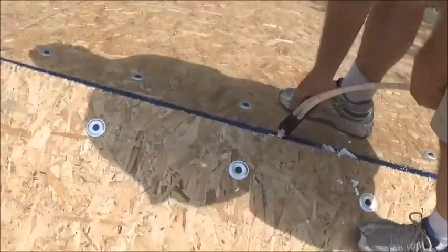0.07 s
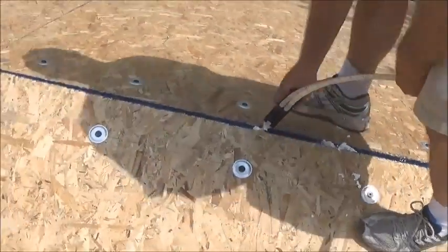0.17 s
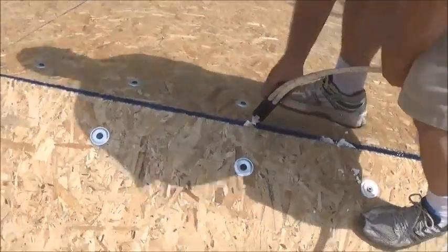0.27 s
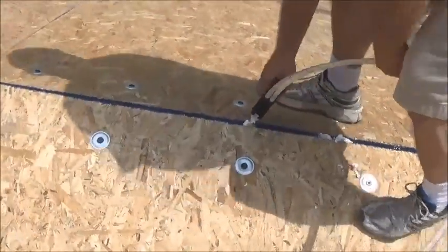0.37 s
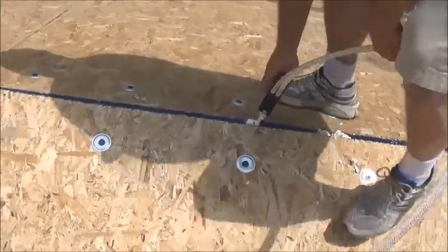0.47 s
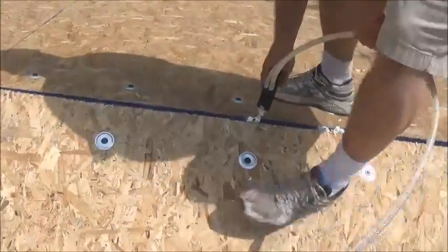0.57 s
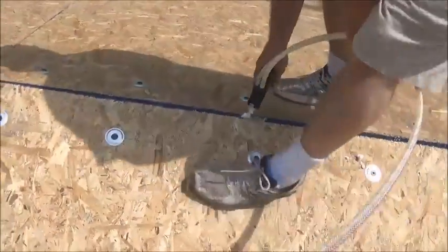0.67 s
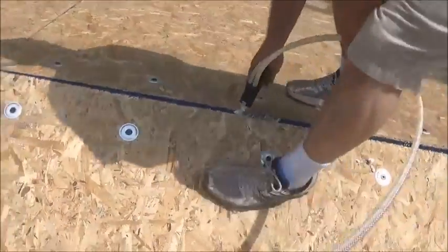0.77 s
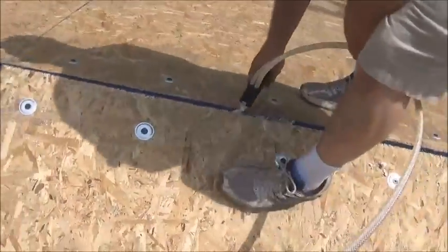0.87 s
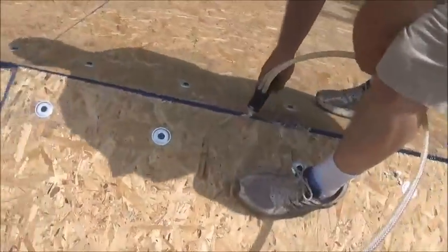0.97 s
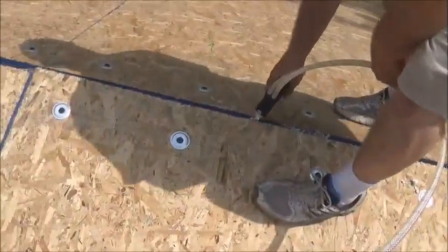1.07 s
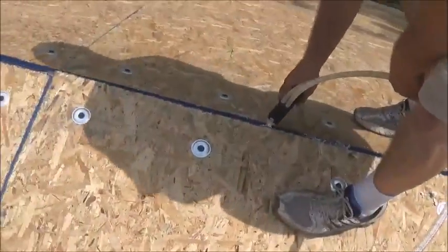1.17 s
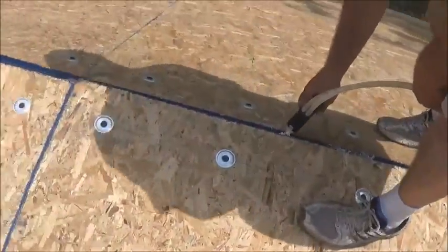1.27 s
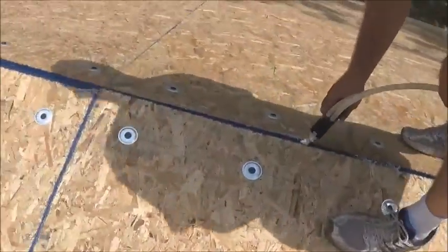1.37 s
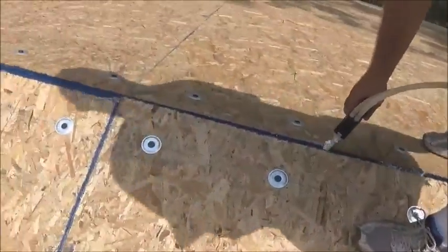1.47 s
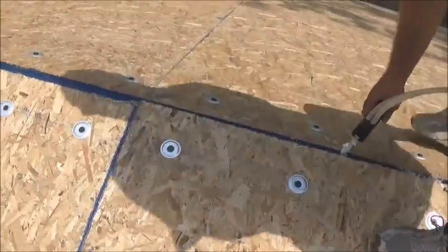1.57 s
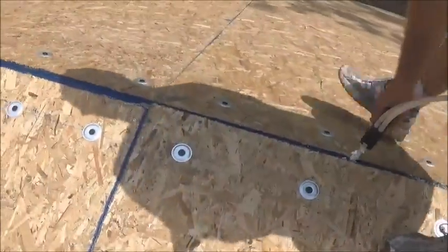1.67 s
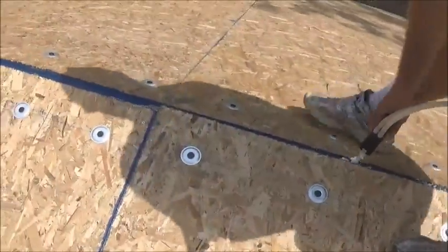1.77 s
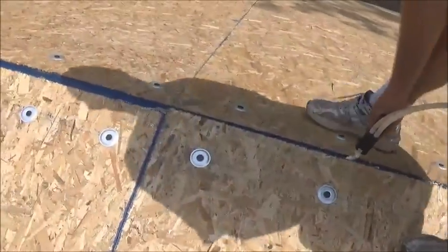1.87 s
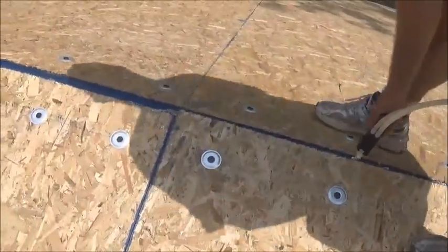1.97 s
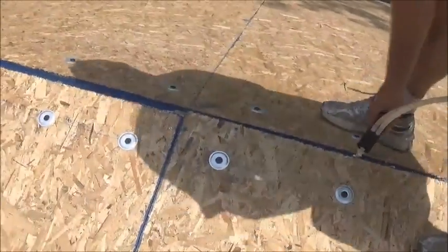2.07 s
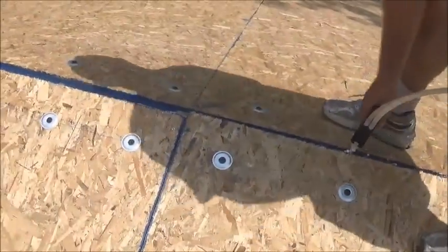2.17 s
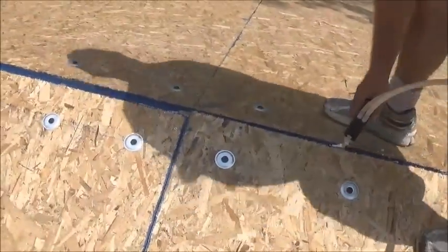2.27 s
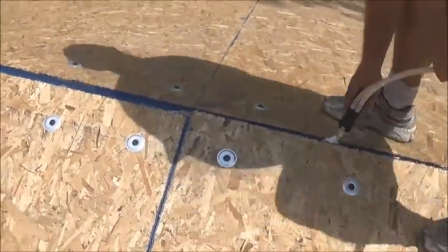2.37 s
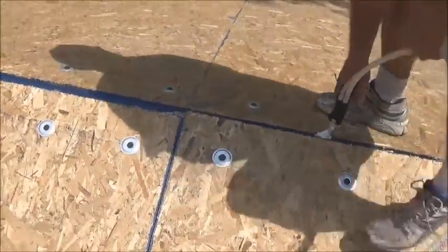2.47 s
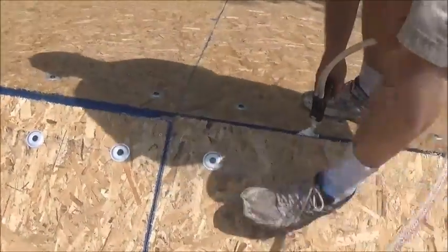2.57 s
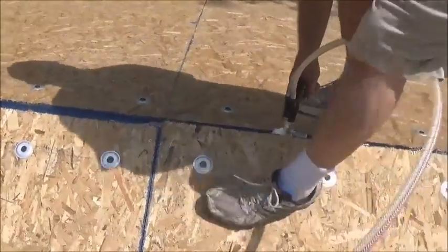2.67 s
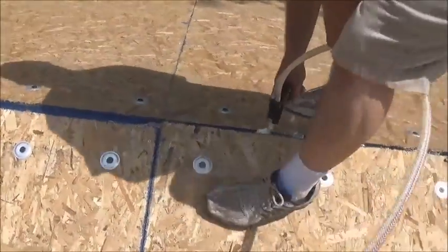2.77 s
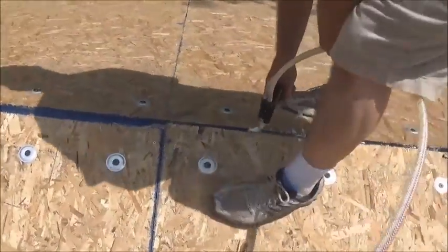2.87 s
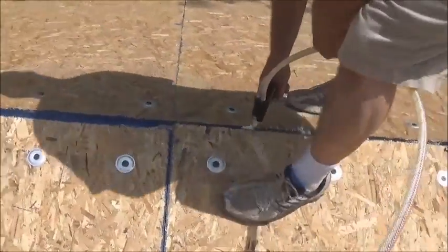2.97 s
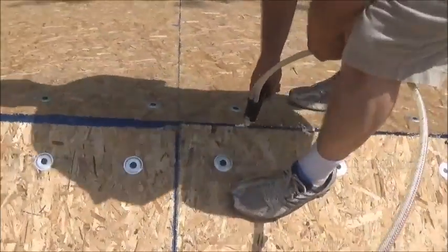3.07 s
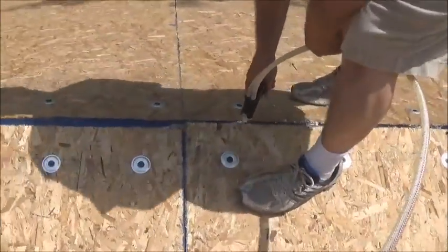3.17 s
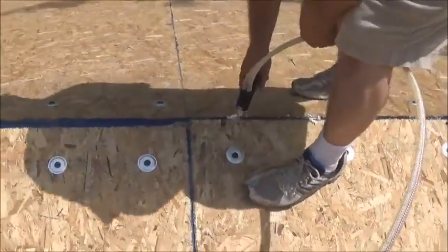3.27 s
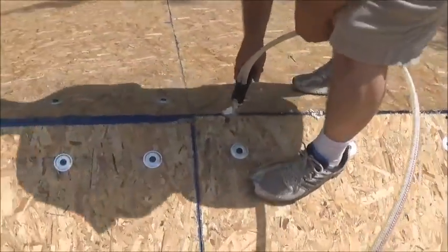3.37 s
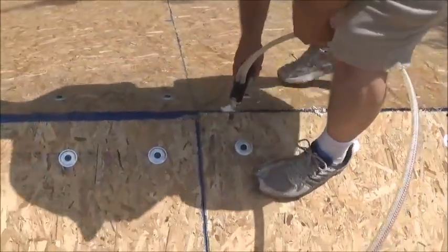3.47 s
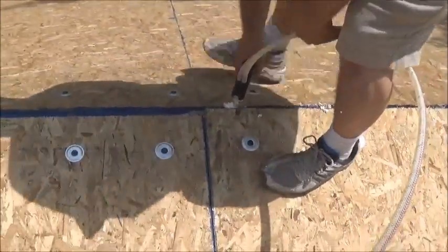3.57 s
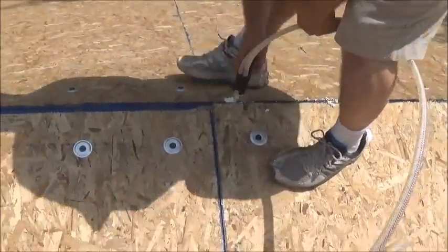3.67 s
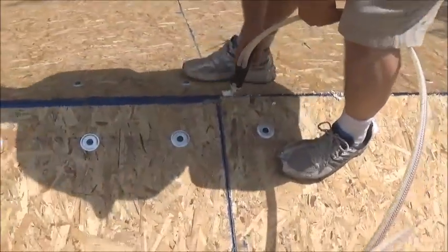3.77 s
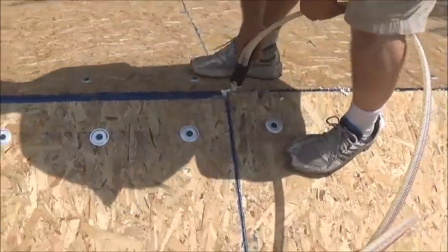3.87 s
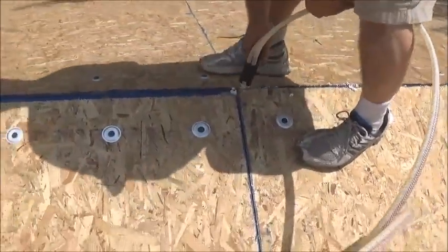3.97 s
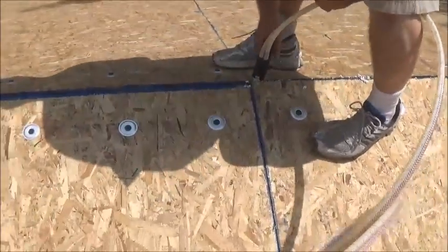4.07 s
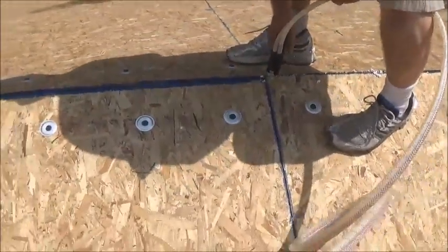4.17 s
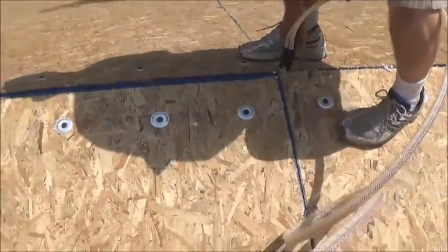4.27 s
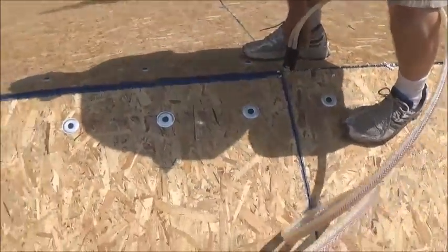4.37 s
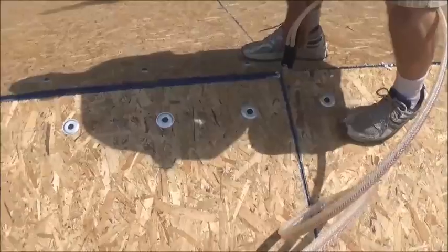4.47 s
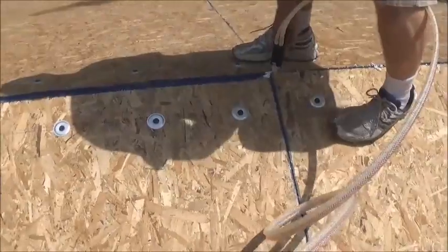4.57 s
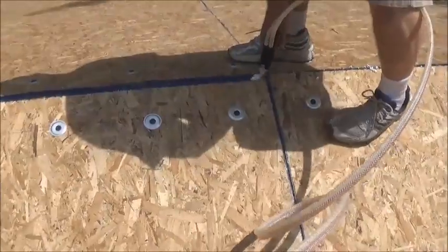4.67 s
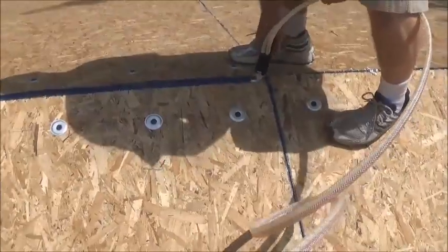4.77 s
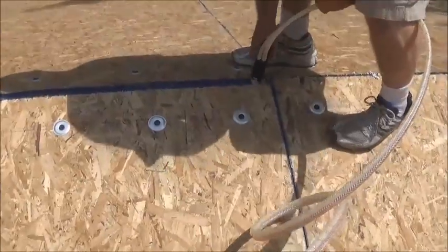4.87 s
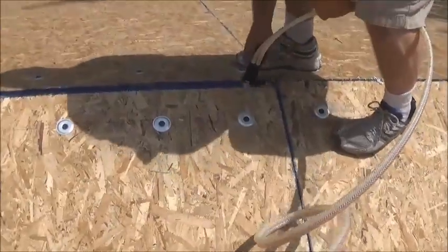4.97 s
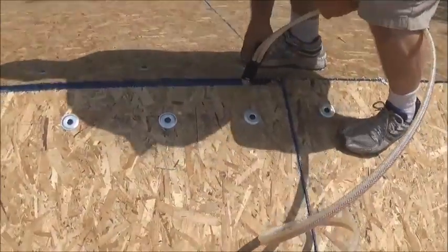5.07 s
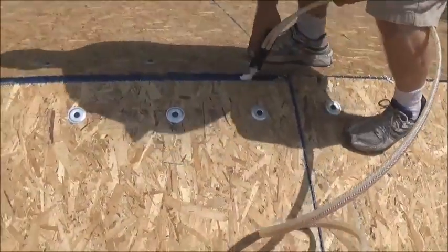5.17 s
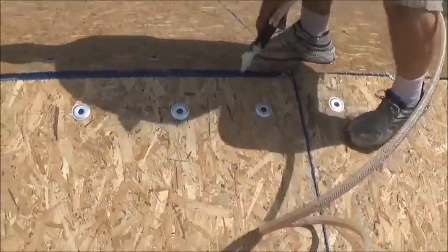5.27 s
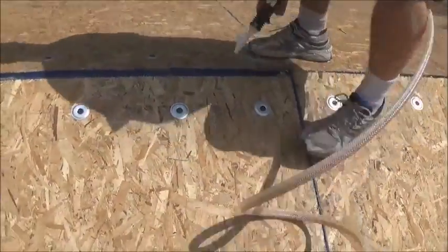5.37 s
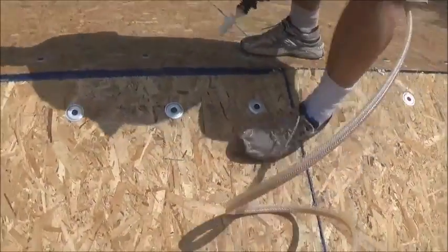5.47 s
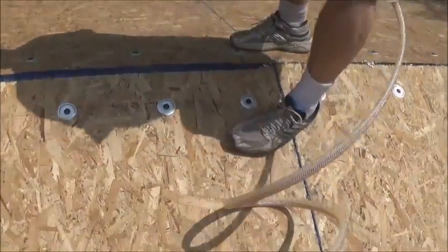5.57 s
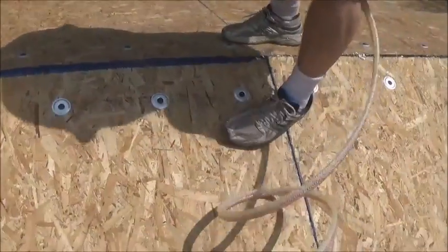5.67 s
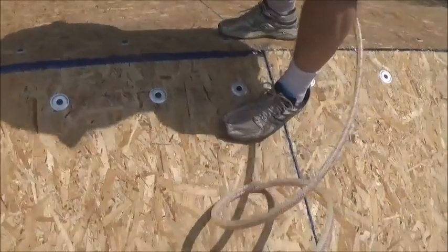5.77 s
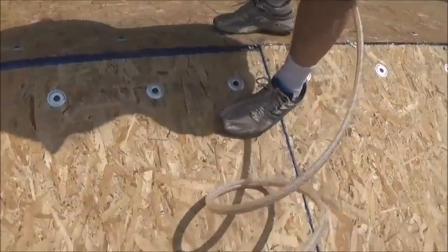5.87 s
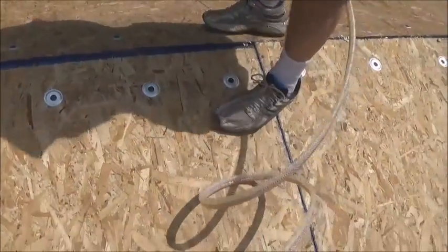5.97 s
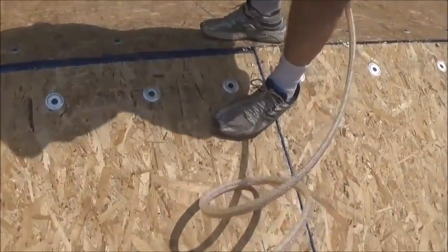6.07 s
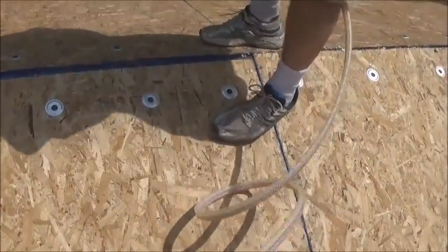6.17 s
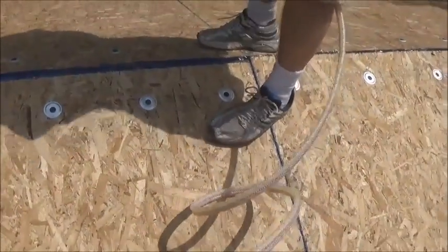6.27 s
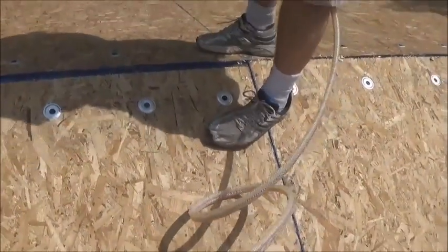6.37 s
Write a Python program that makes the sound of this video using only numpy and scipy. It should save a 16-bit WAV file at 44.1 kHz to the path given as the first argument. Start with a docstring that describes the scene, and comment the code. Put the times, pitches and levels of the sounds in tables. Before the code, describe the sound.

Close, wet, fizzing foam spray runs for five seconds with footsteps on boards, then a spit, a clack and dull hose thumps in light wind.

```python
"""Foam is sprayed along a seam in a wooden roof deck, in light wind: filtered noise hisses, fizzes and gurgles.
From the start tiny pings pop, small pockets ring, and moving echoes off the arm and a leg colour the hiss.
Then shoes knock and scuff on the boards, as fading tones and bursts of noise; later a corner sings.
The trigger is let go and the flow sags; the gun spits puffs of noise and clacks with ringing tones.
Last, the hose drops with dull thuds, the deck booms as a low narrow noise, and the wind is left."""
import sys
import numpy as np
from scipy import signal
from scipy.fft import rfft, irfft, next_fast_len
from scipy.io import wavfile
from scipy.ndimage import uniform_filter1d, map_coordinates

SR = 44100
rng = np.random.default_rng(int(sys.argv[2]) if len(sys.argv) > 2 else 0)


def transcribe(signal):
    """Save signal, clipped to [-1, 1], as a 16-bit WAV file at the path in sys.argv[1]."""
    frames = np.atleast_2d(signal).T
    limited = np.clip(frames, -1, 1)
    pcm = np.round(limited * 32767).astype(np.int16)
    wavfile.write(sys.argv[1], SR, pcm)


N = 283563  # length of the scene in samples
TOP_HZ = 11120


def amp(db):
    """Turn decibels into a gain."""
    return 10 ** (np.asarray(db) / 20)


def unit(x):
    """Scale a sound to an rms (average strength) of 1."""
    return x / np.sqrt(np.mean(x ** 2) + 1e-20)


def curves(rows):
    """Join the rows by straight lines: one curve for each column after the time."""
    s, *columns = np.transpose(rows)
    t = np.arange(N) / SR
    return [np.interp(t, s, column) for column in columns]


def wobble(rate):
    """A smooth random curve through a number of random points each second (rate)."""
    points = rng.standard_normal(int(N * rate / SR) + 4)
    return map_coordinates(points, [np.arange(N) * rate / SR])


def gate(start, end, fade_s):
    """1 between start and end (s), with straight fades inside."""
    t = np.arange(N) / SR
    return np.clip(np.minimum(t - start, end - t) / fade_s, 0, 1)


def add(track, s, sound):
    """Mix a sound into the track at time s."""
    part = track[max(round(s * SR), 0):][:len(sound)]
    part += sound[:len(part)]


def filtered(x, response):
    """Make each frequency louder or softer by the given response."""
    m = next_fast_len(x.shape[-1] + 8192)
    spectrum = rfft(x, m) * response(np.fft.rfftfreq(m, 1 / SR))
    return irfft(spectrum, m)[..., :x.shape[-1]]


def colour(points, hz):
    f, db = np.transpose(points)
    return amp(np.interp(np.log(hz + 1), np.log(f + 1), db)) * (hz < TOP_HZ)


def noise(spectrum):
    """Steady coloured noise of rms 1."""
    return unit(filtered(rng.standard_normal(N), lambda hz: colour(spectrum, hz)))


def narrow(pitch_hz, width_hz):
    """Noise of rms 1 in a narrow resonance that follows a pitch curve."""
    white = rng.standard_normal((2, len(pitch_hz)))
    flutter = filtered(white, lambda f: 1 / (1 + (f / width_hz) ** 2))
    phase = 2 * np.pi * np.cumsum(pitch_hz) / SR
    return unit(flutter[0] * np.cos(phase) + flutter[1] * np.sin(phase))


def ears(mid, side, left_db=0):
    """Left and right from a common part and a diffuse part that has opposite signs in the two ears."""
    return np.array([(mid + side) * amp(left_db / 2), (mid - side) * amp(-left_db / 2)])


def spread(x, side_db):
    """Nearly mono: a faint diffuse part, like x but with random phase, differs between the ears."""
    z = signal.stft(x, nperseg=256)[2]
    scrambled = z * np.exp(2j * np.pi * rng.random(z.shape))
    diffuse = signal.istft(scrambled, nperseg=256)[1][:N]
    return ears(x, amp(side_db) * np.std(x) * unit(diffuse))


# how hard the wind rumbles: (time [s], level [dB])
WIND_RUMBLE = [(0, -56), (1.15, -65), (1.75, -61), (1.86, -38.5), (2.35, -53), (3.4, -53), (3.78, -42.5),
               (4.2, -46), (4.8, -52), (5.3, -41), (5.6, -37.5), (5.95, -41), (6.15, -39)]
# tone of the wind rumble: (frequency [Hz], relative level [dB])
RUMBLE_COLOUR = [(22, -6), (60, 4), (260, -1), (400, -15), (700, -19), (2000, -63)]
# tone of the open-air hiss: (frequency [Hz], relative level [dB])
AIR_COLOUR = [(150, -30), (300, -5.5), (640, -2.5), (1100, -9.5), (6600, -21.5), (8600, -19), (11000, -25)]


def outdoors(air_db=-43.5, air_grows=0.14, air_side_db=-7, rumble_side_db=-12,
             hum_db=-53, hum_hz=88, hum_width_hz=10):
    """Wind rumbles on the microphone; a soft open-air hiss is louder where the rumble is, over a low hum."""
    rumble_db, = curves(WIND_RUMBLE)
    rumble_stereo = ears(noise(RUMBLE_COLOUR), amp(rumble_side_db) * noise(RUMBLE_COLOUR))
    rumble = amp(rumble_db + 1.7 * wobble(13)) * rumble_stereo
    # air_db is reached at the peak of the rumble curve
    air_level_db = air_db + air_grows * (rumble_db - rumble_db.max())
    air = amp(air_level_db) * ears(noise(AIR_COLOUR), amp(air_side_db) * noise(AIR_COLOUR))
    hum = amp(hum_db) * narrow(np.full(N, hum_hz), hum_width_hz)
    return rumble + air + hum


def froth(spectrum, patchy_db):
    """Noise of rms 1 in which short-lived cavities lift and drop narrow bands."""
    z = signal.stft(rng.standard_normal(N), nperseg=512)[2]
    field = rng.standard_normal(z.shape)
    # smooth the random field over pitch, then time, so that each patch lasts a moment
    for _ in range(2):
        field = uniform_filter1d(field, size=3, axis=0)
        field = uniform_filter1d(field, size=8, axis=1)
    patchy = signal.istft(z * amp(patchy_db * unit(field)), nperseg=512)[1][:N]
    return unit(filtered(patchy, lambda hz: colour(spectrum, hz)))


# bursting bubbles: middle pitch [Hz], starting level over the splutter curve before random size [dB]
POP_HZ, POP_DB = 2580, 5


def pops(rate=45, scatter_db=5.0, t60=0.0028):
    """Foam bubbles burst at random, each a tiny ping of its own pitch and size."""
    out, t = np.zeros(N), np.arange(SR // 100) / SR
    count = int(rate * N / SR)
    times = rng.uniform(0, N / SR, count)
    pitches, sizes = rng.standard_normal((2, count))
    for s, pitch, size in zip(times, pitches, sizes):
        hz = POP_HZ * 2 ** (pitch / 2)
        add(out, s, amp(scatter_db * size - 60 * t / t60) * np.sin(2 * np.pi * hz * t))
    return out


# the trigger is let go [s], the flow sags [dB per s], the valve is shut [s] after closing for a while [s]
RELEASE_S, SAG_DB_PER_S, SHUT_S, SHUTTING_S = 5.147, 125, 5.29, 0.06


def trigger():
    """Full flow until the release, then a steady sag until the valve shuts."""
    t = np.arange(N) / SR
    sag = amp(-SAG_DB_PER_S * np.maximum(t - RELEASE_S, 0))
    valve = np.clip((SHUT_S - t) / SHUTTING_S, 0, 1)
    return sag * valve


# how freely the tip blows; burying it trades the gas jet for splutter in the seam, before trim:
# (time [s], jet level [dB], splutter level [dB])
TIP_FLOW = [(0.08, -30.5, -31), (0.11, -23, -29.5), (1.08, -21, -30.5), (1.49, -21.5, -25),
            (1.515, -21, -35), (1.755, -22, -31), (1.79, -25.5, -27.5), (1.85, -30, -32.5),
            (2.22, -30.5, -29.5), (2.27, -21.5, -35), (2.4, -23, -28.5), (2.62, -17, -32), (2.68, -25, -30),
            (2.86, -30, -28), (2.89, -24.5, -26), (3.24, -27, -26.5), (3.38, -18.5, -29.5),
            (3.55, -22, -26.5), (3.735, -23.5, -24), (3.765, -18.5, -31), (4.42, -24.5, -25.5),
            (4.71, -18, -32.5), (4.82, -21, -27), (4.95, -20, -34), (5.14, -20, -28)]
# foam flow heard as fizz, before trim: (time [s], level [dB])
FOAM_FLOW = [(0.07, -33), (0.1, -26), (0.4, -27), (0.8, -30.5), (0.88, -27), (1.3, -23.5), (1.58, -29.5),
             (1.81, -30), (1.84, -34), (2.22, -31.5), (2.3, -26.5), (2.55, -28.5), (2.85, -30),
             (2.97, -22.5), (3.13, -29.5), (3.17, -26), (3.22, -31), (3.27, -26), (3.73, -24.5),
             (3.76, -31), (4.71, -31), (4.8, -23), (4.98, -27), (5.03, -23)]
# tones of the jet, fizz, splutter and gurgle: (frequency [Hz], relative level [dB])
JET_COLOUR = [(3000, -38), (6500, -12), (9000, -4), (10500, -0.5), (11100, -9.5)]
FIZZ_COLOUR = [(1200, -47), (2800, -19), (3400, -4.5), (4200, 0.5), (5700, -0.5), (8700, -12.5),
               (11000, -33)]
SPLUTTER_COLOUR = [(700, -20), (1400, -7.5), (1750, 0.5), (2600, 1), (3300, -2), (4200, -16.5),
                   (11000, -23.5)]
GURGLE_COLOUR = [(50, -19), (220, -4), (400, -11.5), (760, -3), (1250, 1), (1700, -9), (4000, -44)]
# trim of each layer [dB]
JET_DB, FIZZ_DB, SPLUTTER_DB = 0.5, 0.5, -0.83
# gurgle deep in the seam: mean of its level curve [dB], dB gained per dB of splutter, dB lost per dB of jet
GURGLE_DB, GURGLE_GROWS, GURGLE_YIELDS = -33.5, 1, 0.36


def spray():
    """Gas and foam leave the nozzle unevenly; bursting cells roughen the hiss."""
    jet_db, splutter_db = curves(TIP_FLOW)
    fizz_db, = curves(FOAM_FLOW)
    gurgle_gain_db = GURGLE_GROWS * (splutter_db - splutter_db.mean())
    gurgle_loss_db = GURGLE_YIELDS * (jet_db - jet_db.mean())
    gurgle_db = GURGLE_DB + gurgle_gain_db - gurgle_loss_db
    # the flow is least steady when the tip is buried and splutters
    buried = 1 / (1 + amp(jet_db - splutter_db))
    surge_db = (0.61 + 1.2 * buried) * (0.64 * wobble(45) + 0.55 * wobble(260))
    jet = amp(JET_DB + jet_db + 2.8 * buried * wobble(55)) * froth(JET_COLOUR, patchy_db=2.5)
    fizz = amp(FIZZ_DB + fizz_db + 0.72 * wobble(29.8)) * froth(FIZZ_COLOUR, patchy_db=2.1)
    splutter_level = amp(SPLUTTER_DB + splutter_db + 1.14 * wobble(30))
    splutter = splutter_level * froth(SPLUTTER_COLOUR, patchy_db=2.0)
    gurgle = amp(gurgle_db + 1.6 * wobble(25.0)) * froth(GURGLE_COLOUR, patchy_db=2.5)
    bubbles = amp(POP_DB + splutter_db) * pops()
    return trigger() * amp(surge_db) * (jet + fizz + splutter + gurgle + bubbles)


# echo from the arm that holds the gun: (time [s], delay [ms])
ARM_DELAY = [(.2, 1.23), (.9, 1.17), (1.2, 1.24), (1.65, 1.23), (2.1, 1.22), (2.9, 1.13), (3.3, 1.193),
             (3.6, 1.15), (4.1, 1.31), (4.65, 1.46), (5.15, 1.25)]
# this echo fades as the arm turns away: (time [s], strength [ratio to the direct sound])
ARM_ECHO = [(1, 0.25), (4, 0.19)]
# a shoe or shin is set beside the seam and the nozzle draws away from it:
# (time [s], length [s], first delay [ms], last delay [ms])
LEG_STANCES = [(1.797, 0.98, 0.58, 1), (2.695, 1, 1.33, 1.77), (3.697, .93, 0.736, 0.74)]
# strength of the leg echo at 1 ms delay [ratio] (it falls with distance), and its fade in and out [s]
LEG_STRENGTH, LEG_FADE_S = 0.15, 0.053


def reflectors():
    """Delay (ms) and strength of the echo from the arm and from each stance of the leg."""
    paths = [curves(ARM_DELAY) + curves(ARM_ECHO)]
    for s, length, first_ms, last_ms in LEG_STANCES:
        delay_ms, = curves([(s, first_ms), (s + length, last_ms)])
        strength = LEG_STRENGTH / delay_ms * gate(s, s + length, LEG_FADE_S)
        paths.append((delay_ms, strength))
    return paths


def reflected(x, paths):
    """x plus moving echoes; they sweep a comb of notches through it, scaled to even out the power."""
    total, power = x.copy(), 1
    for delay_ms, strength in paths:
        lag = delay_ms * SR / 1000  # in samples
        total += strength * map_coordinates(x, [np.arange(N) - lag])
        power = power + strength ** 2
    return total / np.sqrt(power)


# pockets in the seam that ring briefly as the jet passes: (time [s], length [s], pitch [Hz], level [dB])
SEAM_POCKETS = [(0, 0.24, 880, -40.5), (1.081, .16, 6050, -28.5), (1.2, 0.12, 5100, -31),
                (.7, 1.05, 940, -39.5), (1.441, 0.39, 2355, -34.5), (1.762, .09, 3130, -32.5),
                (1.918, 0.31, 1596, -33.5), (1.967, 0.18, 5700, -37), (2.008, 0.17, 4290, -34.5),
                (2.167, 0.3, 2667, -32), (2.179, .2, 890, -35), (2.274, 0.12, 5080, -28),
                (2.4, 0.1, 3420, -29), (3.079, .26, 799, -33), (3.498, 0.27, 1757, -28.5),
                (3.854, 0.92, 5320, -35.5), (4.979, 0.2, 2950, -36)]


def pockets(width_hz=170, wander=.02, sputter_db=1.4):
    """Each small pocket swells and fades as the jet crosses it; foam bends its pitch and makes it sputter."""
    out = np.zeros(N)
    for s, length, hz, db in SEAM_POCKETS:
        swell = signal.windows.tukey(int(length * SR))
        pitch_hz = hz * (1 + wander * wobble(20)[:len(swell)])
        level = amp(db + sputter_db * wobble(45.7)[:len(swell)])
        add(out, s, level * swell * narrow(pitch_hz, width_hz))
    return out


# tone of the wood chips that crackle under any blow: (frequency [Hz], relative level [dB])
CHIP_COLOUR = [(300, 1), (1500, 3), (2600, -6.5), (4000, -13), (11000, -27)]


def crackle(t60=0.019):
    """A burst of crushed wood chips: coloured noise of rms 1 under a quick fade."""
    t = np.arange(SR // 4) / SR
    chips = filtered(rng.standard_normal(len(t)), lambda hz: colour(CHIP_COLOUR, hz))
    return unit(chips) * amp(-60 * t / t60)


# shoes landing on the deck, before the modes add their own levels:
# (time [s], ring of the board [dB], low thud [dB], bright slap [dB])
FOOTFALLS = [(.665, -17, -36, -25), (0.724, -52, -37, -16), (1.324, -27, -23, -47), (2.413, -25, -42, -46),
             (2.572, -24.5, -35, -39), (2.696, -33, -32, -31), (3.745, -31, -26, -21),
             (4.818, -24, -49, -38), (5.4496, -19.5, -34, -13.5)]
# ringing tones of the deck: (middle pitch [Hz], relative level [dB], time to fall 60 dB [s])
DECK_MODES = [(256, -12, 0.1), (363, -10, 0.15), (499, 1.5, 0.075), (700, -6, 0.04), (1590, -9, 0.042)]
# short tones of the board right under the sole, which merge into one crack:
# (middle pitch [Hz], relative level [dB], time to fall 60 dB [s])
SLAP_MODES = [(720, 0, 0.0091), (1140, -6.5, 0.011)]
# low tones of the joists under the deck: (middle pitch [Hz], time to fall 60 dB [s])
JOIST_MODES = [(105, 0.035), (175, 0.062), (270, 0.059)]


def steps(onset_s=0.00066, crackle_db=-8):
    """Each footfall slaps the board, rings its modes and thuds into the joists; a soft one builds up slowly."""
    out, t = np.zeros(N), np.arange(SR // 4) / SR

    def mode(hz, t60):
        """One fading tone, slightly off its middle pitch."""
        return amp(-60 * t / t60) * np.sin(2 * np.pi * hz * rng.normal(1, 0.024) * t)

    for s, ring_db, thud_db, slap_db in FOOTFALLS:
        ring = sum(amp(ring_db + level + rng.normal(0, 0.84)) * mode(hz, t60)
                   for hz, level, t60 in DECK_MODES)
        thud = amp(thud_db) * sum(mode(hz, t60) for hz, t60 in JOIST_MODES)
        # neighbouring slap modes start in opposite directions
        slap = sum((-1) ** k * amp(slap_db + level) * mode(hz, t60)
                   for k, (hz, level, t60) in enumerate(SLAP_MODES))
        rise_s = onset_s * amp((ring_db - slap_db) / 2)
        rise = 1 - np.exp(-t / rise_s)
        add(out, s, amp(slap_db + crackle_db) * crackle() - rise * (ring + thud) - slap)
    return out


# short bursts of low noise: soles or hose sliding, the clack's after-tap, the low part of a spit:
# (time [s], length [s], level [dB])
LOW_BURSTS = [(0.665, 0.098, -28.5), (1.81, 0.2, -34.5), (2.667, 0.058, -27), (3.727, 0.12, -37.5),
              (3.936, 0.73, -37.5), (5.55, 0.019, -37), (5.923, 0.034, -39)]
# tone of these bursts: (frequency [Hz], relative level [dB])
SCUFF_COLOUR = [(60, -23), (200, 1.5), (1400, -4.5), (3000, -29), (11000, -22)]


def scuffs():
    """Short bursts of low, fluttering noise: slides that catch and slip, an after-tap and the low part of a spit."""
    level = np.zeros(N)
    for s, length, db in LOW_BURSTS:
        add(level, s, amp(db) * signal.windows.tukey(int(length * SR)))
    fluttering = unit(noise(SCUFF_COLOUR) * amp(3.5 * wobble(220)))
    return level * fluttering


# hollow note of the foam-filled corner: (time [s], pitch [Hz], level [dB])
CORNER_NOTE = [(4.5, 564, -31.5), (4.76, 593, -43.5), (4.81, 662, -26), (4.97, 660, -38), (5.17, 641, -34)]


def hollow(width_hz=52, fade_s=0.076):
    """The jet blows across the corner of the seam, whose note mostly rises as foam fills it."""
    pitch_hz, level_db = curves(CORNER_NOTE)
    note = amp(level_db) * narrow(pitch_hz, width_hz)
    return note * gate(CORNER_NOTE[0][0], SHUT_S, fade_s) * trigger()


# spits of the closed gun, before a soft attack: (time [s], level [dB], time to fall 60 dB [s])
GUN_SPITS = [(5.326, -24.5, 0.054), (5.929, -37.5, 0.095)]
# tone of the spits: (frequency [Hz], relative level [dB])
SPIT_COLOUR = [(400, -21), (1900, -2), (2900, 8.5), (3600, -4), (4600, 3.5), (7200, -4.5), (10000, 3)]
# gas seeping from the nozzle as it closes and after: start [s], end [s], middle level [dB]
SEEP_FROM_S, SEEP_TO_S, SEEP_DB = 5.2, 5.99, -52.5


def spits(attack=0.00081):
    """Trapped gas seeps out and escapes in short puffs."""
    puffs, t = np.zeros(N), np.arange(SR // 5) / SR
    for s, db, t60 in GUN_SPITS:
        add(puffs, s, amp(db - 60 * t / t60) * (1 - np.exp(-t / attack)))
    seep = amp(SEEP_DB + 1.3 * wobble(21)) * gate(SEEP_FROM_S, SEEP_TO_S, fade_s=0.039)
    return puffs * noise(SPIT_COLOUR) + seep * noise(JET_COLOUR)


# the gun clacks as it is lifted: (time [s], level [dB])
GUN_CLACK = (5.536, -26.5)
# ringing tones of the gun body: (pitch [Hz], relative level [dB], time to fall 60 dB [s])
GUN_MODES = [(620, 2.5, 0.04), (1650, 4, 0.018), (4260, -7, .018), (4850, -7, 0.016)]


def clack(snap_db=-4, snap_t60=0.012):
    """A snap and a short ring of the plastic gun body."""
    out, t = np.zeros(N), np.arange(SR // 8) / SR
    s, db = GUN_CLACK
    ring = sum(amp(level - 60 * t / t60) * np.sin(2 * np.pi * (hz * t + rng.random()))
               for hz, level, t60 in GUN_MODES)
    snap = amp(snap_db - 60 * t / snap_t60) * rng.standard_normal(len(t))
    add(out, s, amp(db) * (ring + snap))
    return out


# the slack hose falls on the deck and settles:
# (time [s], thud level [dB], thud pitch [Hz], thud time to fall 60 dB [s], crackle level [dB])
HOSE_FALLS = [(6.047, -13.5, 165, .03, -20.5), (6.077, -21.5, 274, 0.065, -48),
              (6.109, -19.5, 115, 0.048, -50)]


def hose():
    """Each fall of the hose is a dull, short thud with a crackle on top."""
    out, t = np.zeros(N), np.arange(SR // 4) / SR
    for s, thud_db, hz, t60, crackle_db in HOSE_FALLS:
        thud = amp(thud_db - 60 * t / t60) * np.sin(2 * np.pi * hz * t)
        add(out, s, amp(crackle_db) * crackle() - thud)
    return out


# the deck booms under shifting weight: (time [s], level [dB])
DECK_BOOM = [(6.13, -38), (6.23, -38), (6.3, -43), (6.37, -32), (6.43, -26.5)]


def boom(pitch_hz=120, width_hz=40, fade_s=0.044):
    """The whole deck hums low as it flexes."""
    level_db, = curves(DECK_BOOM)
    hum = amp(level_db) * narrow(np.full(N, pitch_hz), width_hz)
    return hum * gate(DECK_BOOM[0][0], np.inf, fade_s)


# place of the nozzle: (time [s], left minus right [dB])
NOZZLE_PAN = [(.5, -0.2), (1.85, -3), (2.9, -.5)]
# gain of a second spray noise that widens the hiss [dB]
WIDENING_DB = -15.5


def scene():
    """A weaker second spray noise, opposite in the two ears, widens the hiss; feet close by, wind all around."""
    pan_db, = curves(NOZZLE_PAN)
    central = reflected(spray(), reflectors()) + hollow() + pockets()
    widening = amp(WIDENING_DB) * spray()
    hiss = ears(central, widening, pan_db)
    gun = spread(spits() + clack(), side_db=-14)
    deck = spread(steps() + scuffs() + hose() + boom(), side_db=-20)
    return hiss + gun + deck + outdoors()


def record(dry):
    """Nothing above the band limit is kept."""
    return filtered(dry, lambda hz: hz < TOP_HZ)


dry = scene()
out = record(dry)
transcribe(out)
```